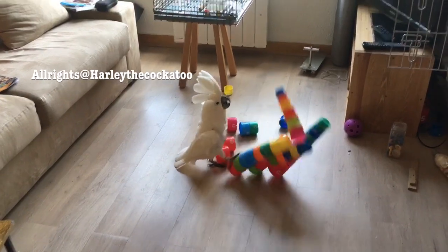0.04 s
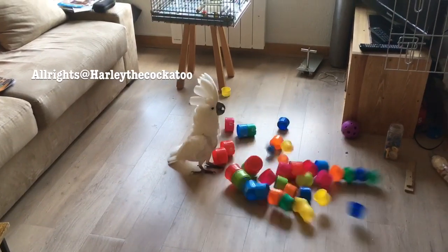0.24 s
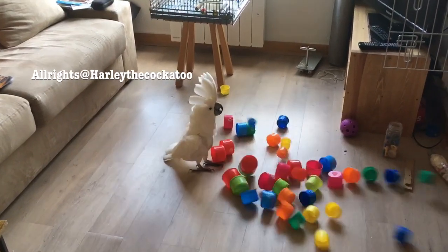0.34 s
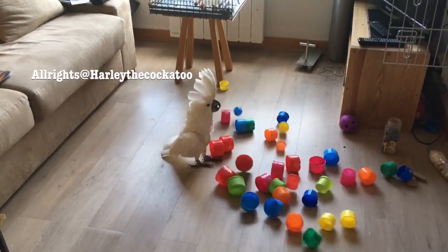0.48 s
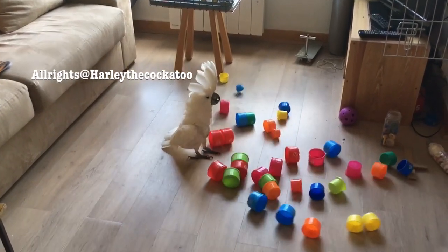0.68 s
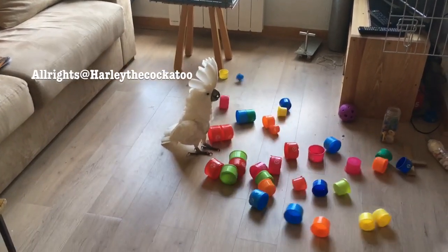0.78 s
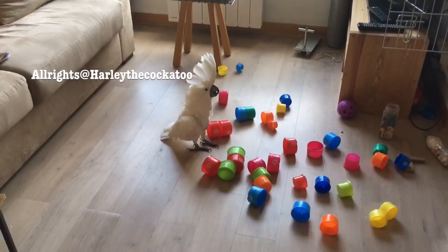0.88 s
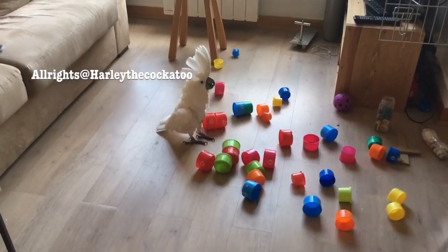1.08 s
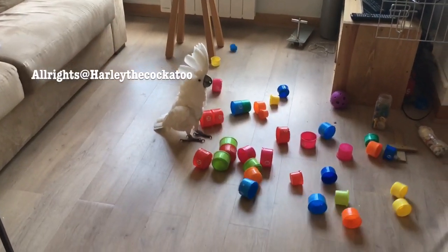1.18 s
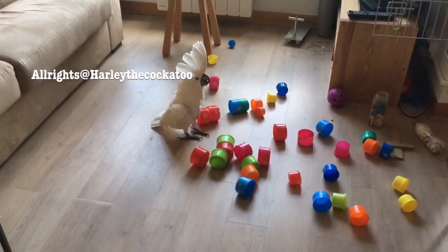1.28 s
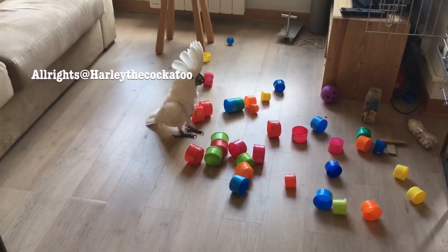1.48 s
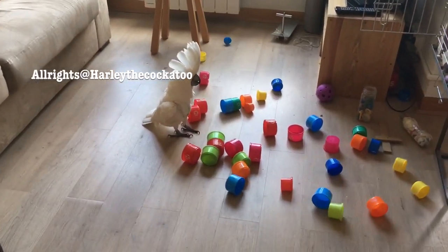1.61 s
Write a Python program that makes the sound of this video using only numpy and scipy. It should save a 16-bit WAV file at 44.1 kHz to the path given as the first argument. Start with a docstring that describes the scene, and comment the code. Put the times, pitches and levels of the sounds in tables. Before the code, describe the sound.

Hollow plastic cups tumble onto floorboards in a living room. A brief soft rattle leads into a loud clatter of sharp clicks and light thuds, which dies down to single cups bouncing, with a slight echo.

```python
"""In a lively living room, a tower of plastic stacking cups slips and crashes onto a wooden floor.
The cups scatter, and a few bounce on alone. Every contact is a hard click of the rim, a short
hollow ring of the cup and a thud of the boards; the hits that stand out also make the rim ring.
The room echoes it all, over a faint steady background."""
import sys
import numpy as np
from scipy import signal
from scipy.fft import rfft, irfft, next_fast_len
from scipy.io import wavfile

SR = 44100
rng = np.random.default_rng(int(sys.argv[2]) if len(sys.argv) > 2 else 0)


def wrap_up_sound(samples):
    """Save the sound to the file named by the first command line argument, as 16-bit audio."""
    columns = np.atleast_2d(samples).T
    # keep every value between -1 and 1, then stretch to whole-number steps
    tamed = np.clip(columns, -1, 1)
    steps = np.round(tamed * 32767).astype(np.int16)
    wavfile.write(sys.argv[1], SR, steps)


N = 72765
T = np.arange(2048) / SR  # the clock for one contact [s]


def amp(db):
    """Turn decibels into a number to multiply a sound by."""
    return 10 ** (np.asarray(db) / 20)


def unit(x):
    """Scale a sound to an energy of 1."""
    return x / np.sqrt(np.sum(x ** 2) + 1e-20)


def along(points, hz):
    """Read between the rows of a (frequency, value) table, giving each octave equal room."""
    frequencies, values = np.transpose(points)
    return np.interp(np.log(hz + 1), np.log(frequencies), values)


def add(out, start_s, x):
    """Mix x into out at the given time."""
    i = max(0, round(start_s * SR))
    part = out[i:i + len(x)]
    part += x[:len(part)]


def ringing(tones, scale, attack_s):
    """A struck object sounds several tones at once; each drops 60 dB over its fade time."""
    hz, db, fade_s = np.transpose(tones)[:, :, None]
    signs = (-1) ** np.arange(len(tones))[:, None]  # every other tone starts downward
    waves = signs * np.sin(2 * np.pi * scale * hz * T)
    fades = amp(db - 60 * T / fade_s)
    onset = 1 - np.exp(-T / attack_s)
    return unit((waves * fades).sum(0) * onset)


# the tone colour of the room's own noise (frequency [Hz], relative level [dB])
BACKGROUND_COLOUR = [(25, -9), (55, 5.5), (110, 6.5), (220, -18.5), (330, 7.5), (600, 1), (1500, 2),
                     (3000, -17.5), (8000, -21.5), (15000, -38)]

def background(level_db=-53):
    """Faint, low room noise that never changes."""
    colour = amp(along(BACKGROUND_COLOUR, np.fft.rfftfreq(N, 1 / SR)))
    noise = irfft(rfft(rng.standard_normal(N)) * colour, N)
    return amp(level_db) * noise / noise.std()


# the tone colour of a click (frequency [Hz], relative level [dB])
CLICK_COLOUR = [(300, -10), (1500, -1.5), (2800, 1.5), (4000, -2), (5000, -5), (6300, -0.5), (8200, -4.5),
                (9400, -2.5), (10400, -6), (11700, -2.5), (15500, -5)]

def rim_click(tilt_db):
    """A hard rim gives one sharp crack, coloured and briefly smeared by the cup's wall."""
    hz = np.fft.rfftfreq(len(T), 1 / SR)
    knots = np.linspace(0, SR / 2, 40)
    ripple_db = 2.06 * np.interp(hz, knots, rng.standard_normal(len(knots)))
    delay_s = 0.001509 * np.interp(hz, knots, rng.random(len(knots)))
    octaves = np.log2(np.maximum(hz, 1500) / 6000)  # a higher tilt makes a brighter click
    colour = amp(along(CLICK_COLOUR, hz) + ripple_db + tilt_db * octaves)
    # pack the sound at the very start (minimum phase), then delay each frequency a little
    early = T < T[-1] / 2
    cepstrum = irfft(np.log(colour))
    packed = rfft(2 * cepstrum * early)
    smear = 2 * np.pi * np.cumsum(delay_s) * hz[1]
    return unit(early * irfft(np.exp(packed - 1j * smear)))


# the tones of a cup's body (multiple of its pitch, relative level [dB], fade time [s])
CUP_TONES = [(.47, -14, 0.014), (.7, -4.5, 0.014), (.88, -2.5, 0.016), (1.01, -1.5, 0.029)]

def cup_ring(pitch_hz):
    """The hollow plastic body rings for a moment."""
    return ringing(CUP_TONES, pitch_hz, attack_s=0.00048)


# the tones of the wooden floor (frequency [Hz], relative level [dB], fade time [s])
BOARD_TONES = [(144, 2, 0.052), (227, 3, 0.065), (281, 2.5, 0.031), (369, 4.5, 0.049), (583, 0.5, 0.026),
               (790, 4.5, 0.034)]

def floor_thud():
    """The boards thud, a little higher or lower from spot to spot."""
    spot = np.exp(0.12 * np.clip(rng.standard_normal(), -1, 1))
    return ringing(BOARD_TONES, spot, attack_s=0.002)


def contact(pitch_hz, ring_db, click_db, tilt_db, thud_db):
    """One cup meets the floor: click, ring and thud together."""
    click = amp(click_db) * rim_click(tilt_db)
    ring = amp(ring_db) * cup_ring(pitch_hz)
    thud = amp(thud_db) * floor_thud()
    return click + ring + thud


# how long the room keeps sounding (frequency [Hz], time to drop 60 dB [s])
ROOM_FADE = [(150, 0.37), (500, 0.42), (1400, 0.32), (4000, .42), (9000, 0.3), (15000, 0.15)]
# the first echoes off the walls (delay [s], level [dB])
WALL_ECHOES = [(.0065, -16.5), (0.0092, -13), (.0135, -15), (0.02, -17)]

def room(x, tail_db=1.5, scatter_s=0.001):
    """The walls add a few quick echoes and a blurred tail, new for each spot on the floor."""
    hz, t, noise = signal.stft(rng.standard_normal(32768), SR, nperseg=256)
    fades = amp(-60 * t / along(ROOM_FADE, hz)[:, None])
    tail = signal.istft(noise * fades, SR, nperseg=256)[1]
    response = amp(tail_db) * unit(tail)
    response[0] += 1  # the sound that arrives directly
    for delay_s, db in WALL_ECHOES:
        add(response, delay_s + scatter_s * rng.standard_normal(), amp([db]))
    return signal.fftconvolve(x, response)


# bursts of small contacts: the tower leans, cups slide apart, crash, tumble, roll and settle
# (start [s], end [s], typical pitch [Hz], ring [dB], click [dB], thud [dB], drop by the end [dB])
RATTLES = [(0.0, 0.109, 924, -26.5, -25.5, -29, 6), (0.125, 0.221, 954, -21, -19.5, -42, 2.5),
           (0.239, 0.319, 1756, 3, 4, -1, 7.5), (0.337, 0.56, 1601, -6, -11.5, -12, 3.5),
           (0.564, 0.779, 1830, -11, -13, -15, 5), (0.799, 1.036, 1554, -19.5, -22.5, -21, 9.5),
           (1.041, 1.232, 1170, -17, -20, -19.5, 19.5), (1.258, 1.352, 1760, -17.5, -27, -24.5, 2),
           (1.402, 1.561, 1925, -28.5, -36, -32, -2), (1.56, 1.65, 1880, -17.5, -32, -28, 15)]

def rattling_cups(contacts_per_s=150, count=40, pitch_spread=0.233, spread_db=0.5):
    """Many cups of mixed sizes touch at uneven moments; most bursts weaken as they go."""
    out = np.zeros(N)
    for start, end, pitch_hz, ring_db, click_db, thud_db, drop_db in RATTLES:
        rattle = np.zeros(SR // 2 + len(T))
        times = (np.arange(count) + rng.random(count)) / contacts_per_s
        for time_s, (size, force, hardness) in zip(times, rng.standard_normal((count, 3))):
            if time_s < end - start:
                hz = pitch_hz * np.exp(pitch_spread * np.clip(size, -2, 1))
                sound = contact(hz, ring_db, click_db + spread_db * hardness, 0, thud_db)
                level_db = spread_db * np.clip(force, -2, 1) - drop_db * time_s / (end - start)
                add(rattle, time_s, amp(level_db) * sound)
        add(out, start, room(rattle))
    return out


# the tones of a cup's rim (multiple of its pitch, relative level [dB], fade time [s])
RIM_TONES = [(.85, -14.5, 0.0018), (1, 3, 0.0059), (1.12, -4.5, 0.0033)]

def rim_ring(pitch_hz):
    """The struck rim gives a high, very short ping."""
    return ringing(RIM_TONES, pitch_hz, attack_s=0.0002)


# cups landing one by one (time [s], cup pitch [Hz], ring [dB], click [dB],
# click tilt [dB per octave], rim pitch [Hz], rim ring [dB], thud [dB])
HITS = [(0.001, 1800, -19, -18.5, 5, 5950, -28, -25), (0.0229, 2010, -30, -14, 2.5, 3370, -47, -42),
        (0.094, 1000, -32, -23, 1, 8900, -27.5, -30), (0.1155, 1020, -17.5, -12.5, 4.5, 5970, -23, -28),
        (0.129, 1000, -16, -22, -6, 5900, -32, -41), (0.1593, 990, -8.5, -12.5, -2.5, 2970, -24, -26),
        (0.188, 1020, -36, -13, 3, 3100, -36, -45), (0.2201, 1320, -26, -1, 0, 2800, -15, -22),
        (0.2231, 1298, -8, -4.5, 2, 3580, -4, -42), (0.2293, 1300, 6.5, 0.5, 2, 3670, -30, -27),
        (0.239, 1565, 1, 8.5, 1, 5520, 2, -1), (0.2435, 1850, -4, 4.5, 1, 5300, -8, -2),
        (0.2551, 1386, 1, -15, -4, 6600, -3.5, -38), (0.2722, 1137, 8.5, 7.5, -3, 2860, -7, 3),
        (0.31, 1204, 2, -3, 2, 2960, -6, -22), (0.320, 1995, 5, 5.5, -1, 6430, -5, -35),
        (0.352, 1986, 4, -22, 10, 2800, -13, -10), (0.41, 1020, -2, -30, -11, 3000, -10.5, -10),
        (0.4397, 1527, 3, 2.5, -4.5, 7500, -5.5, -8), (0.457, 960, -8, -15, -8, 2970, -26, -26),
        (0.517, 1680, -5, -4, 0, 7160, -18, -14), (0.599, 1910, -13, -4.5, -1, 6340, -19, -25),
        (0.618, 1945, -7, -9, 8, 2980, -19, -25), (0.636, 1670, -22, -2.5, -10, 2950, -18, -11),
        (0.6829, 968, -0.5, -5, -2, 2660, -5, -2), (0.7227, 1035, -5, -7, -1, 5740, -26, -24),
        (0.7882, 2000, 8.5, 4, 4.5, 7044, -10, -7), (0.798, 1686, 6.5, -6, 1.5, 7000, -27, -5),
        (0.8972, 1980, -32, -8.5, -0.5, 3370, -43, -16.5), (0.9527, 1500, -38, -11, 13, 6250, -24, -20),
        (1.0367, 2084, -2.5, -9, -0.5, 4430, -15, -9), (1.04, 1990, -2, -24, -17, 3760, -17.5, -15),
        (1.206, 1976, -22.5, -26, 0, 6050, -44, -23), (1.2409, 2090, -39, -8, -0.5, 5600, -16.5, -26),
        (1.28, 2050, -15, -19, 8, 2532, -28, -35), (1.292, 1990, -17.5, -19, -2, 2480, -36, -21.5),
        (1.3507, 1700, -11, -14, 1, 5950, -11, -26), (1.356, 1686, -7, 0, -2.5, 2530, -8.5, -18),
        (1.418, 1804, -13, -31, 7, 2600, -33, -46), (1.512, 1814, -15, -22, -4, 2443, -45, -37),
        (1.6096, 1900, -24, -4, 7, 6000, -14.5, -32), (1.618, 1884, -7.5, -12, -5.5, 3656, -13, -30),
        (1.63, 1870, -7.5, -20, -23, 2640, -14, -26)]

def single_hits():
    """The contacts that stand out from the rattle; these also ring the rim."""
    out = np.zeros(N)
    for time_s, pitch_hz, ring_db, click_db, tilt_db, rim_hz, rim_db, thud_db in HITS:
        rim = amp(rim_db) * rim_ring(rim_hz)
        hit = contact(pitch_hz, ring_db, click_db, tilt_db, thud_db)
        add(out, time_s, room(hit + rim))
    return out


def scene():
    """Everything reaches one microphone; a low-cut filter thins the deep bass of the clatter."""
    bass_cut = signal.butter(2, 251, "highpass", fs=SR, output="sos")
    cups = signal.sosfilt(bass_cut, single_hits() + rattling_cups())
    return (background() + cups)[None]


def record(dry, ceiling=0.7, top_hz=15800):
    """The loudest peaks are rounded off and the very highest treble is cut away."""
    rounded = dry / (1 + np.abs(dry / ceiling) ** 6) ** (1 / 6)
    padded = next_fast_len(N + SR // 2)
    kept = np.fft.rfftfreq(padded, 1 / SR) < top_hz
    return irfft(rfft(rounded, padded) * kept, padded)[:, :N]


dry = scene()
out = record(dry)
wrap_up_sound(out)
```